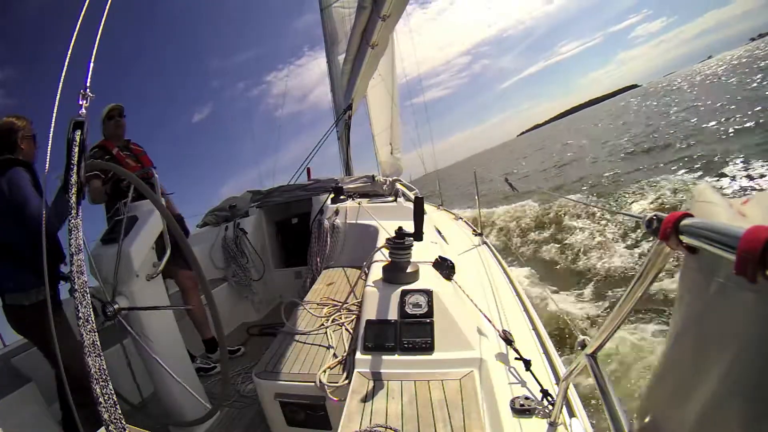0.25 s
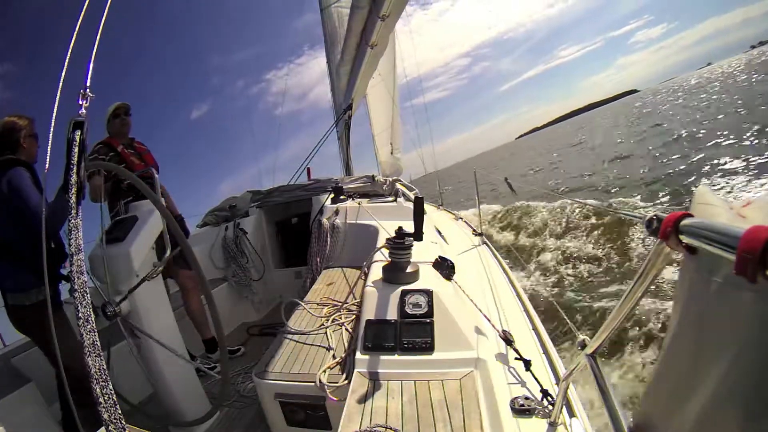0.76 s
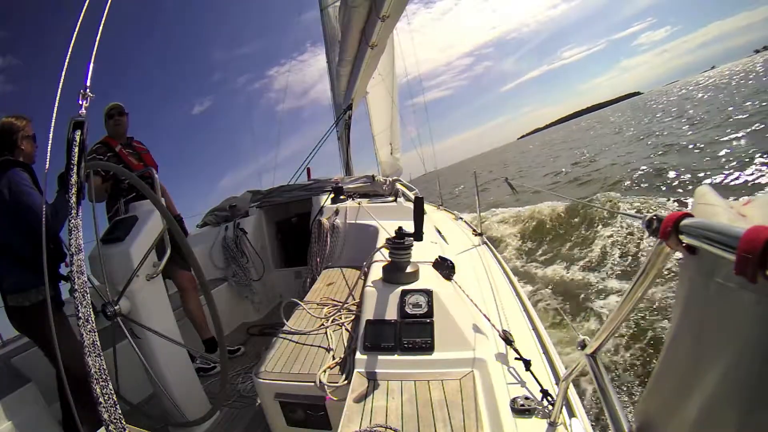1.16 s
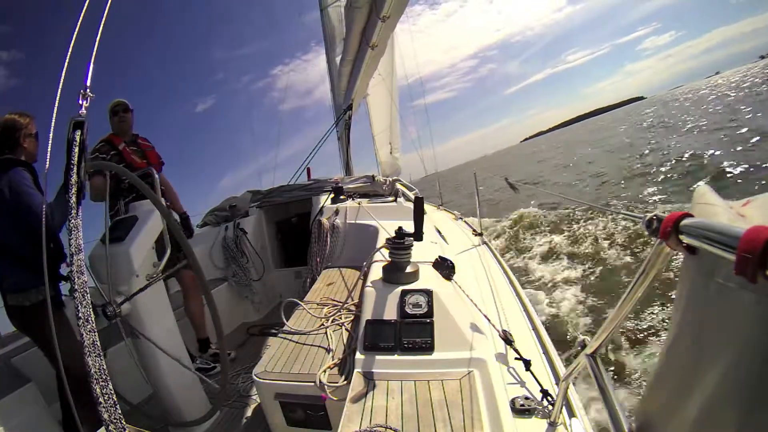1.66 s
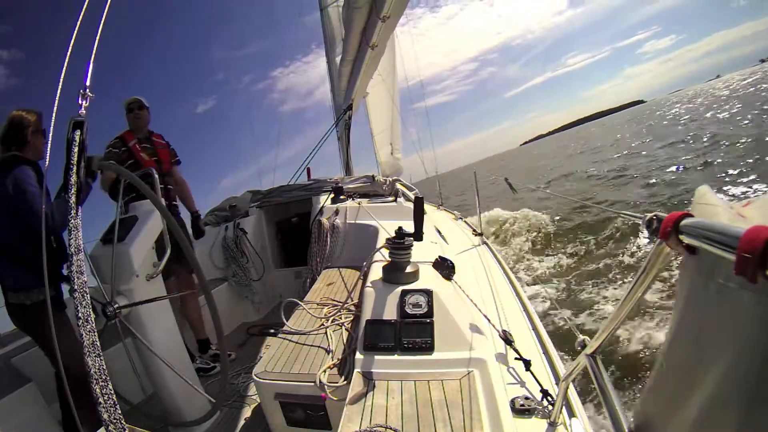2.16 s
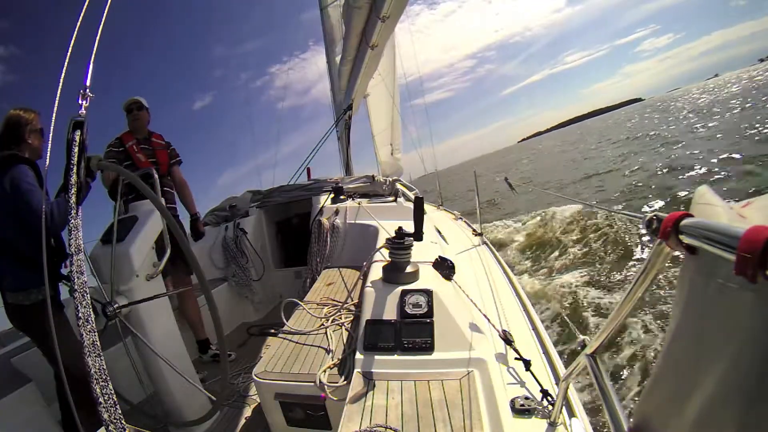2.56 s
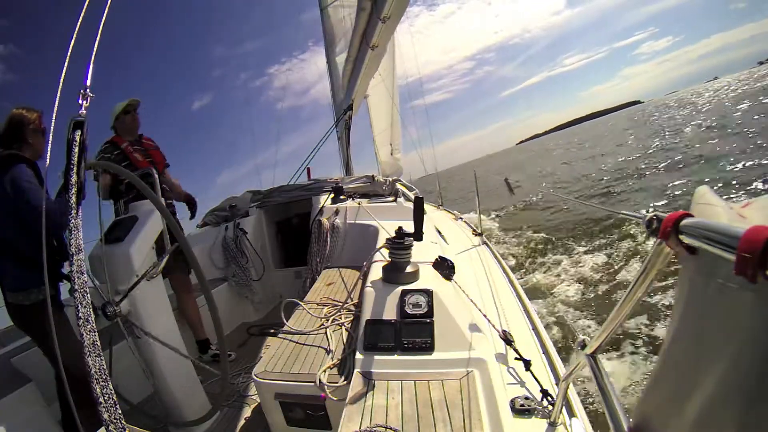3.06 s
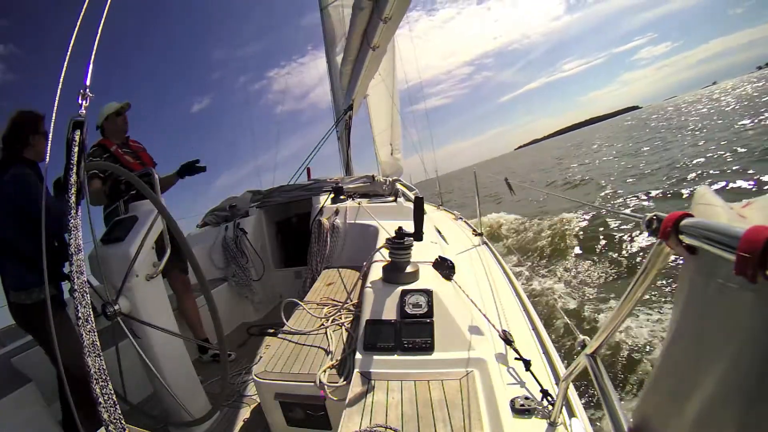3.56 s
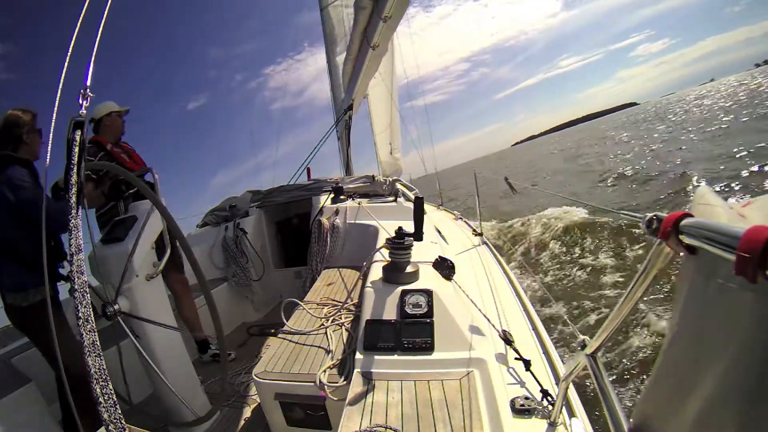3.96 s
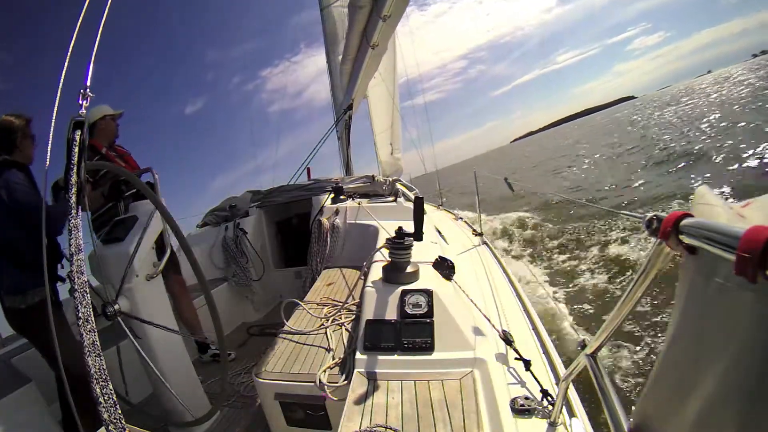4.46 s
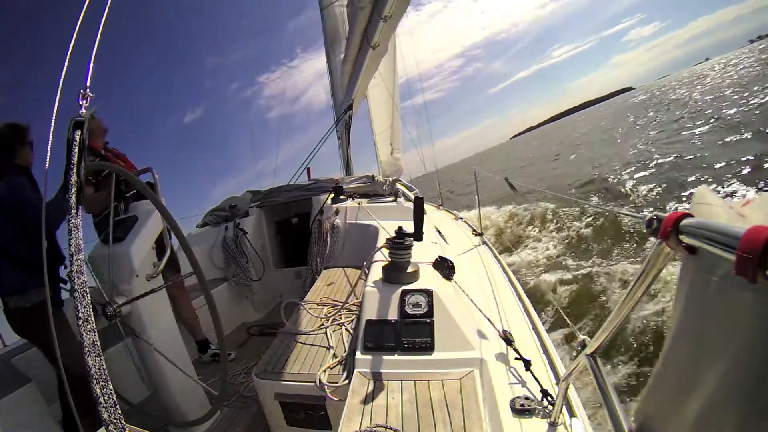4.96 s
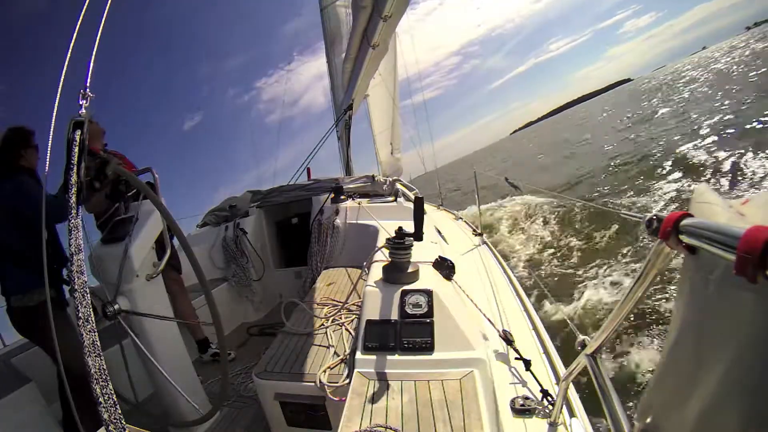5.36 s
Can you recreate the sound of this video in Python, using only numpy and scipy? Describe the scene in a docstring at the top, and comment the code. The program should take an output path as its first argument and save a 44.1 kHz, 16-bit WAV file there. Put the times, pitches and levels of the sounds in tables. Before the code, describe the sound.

One continuous mono passage of about 5.6 seconds, heard through a closed microphone case clamped on deck. A low hull hum and a deeper boom lead throughout, wavering in quick uneven swells; wind adds almost subsonic thumps, notably at 1.0 and 4.4. Water washes dully along the side, with softer bubbling foam and a thin fizz of spray. It begins fairly strong, eases after 0.7, swells around 3.0, thins near 4.2. Crackling wavelet slaps cluster at 0.05, 0.96, 1.65, 2.8-2.9 and 5.2. Faint dry ticks with tiny echoes come at 1.9, 2.2 (sharpest), 2.5, 2.7, 3.7, 4.5, 4.8 and 5.1. A rope creaks very briefly at 2.05; a low plop at 2.1 and quick falling blips at 3.6 and 3.8. From 4.4 the hull tone gathers and booms most heavily, peaking around 5.0-5.2 with a surge of wash, and foam rises again until the abrupt end.

```python
"""The hull of a sailing boat at speed hums and booms: noise shaped by its resonances, in swells.
Wind buffets a closed microphone case clamped on deck as slow, deep noise that peaks in gusts.
Slosh, foam and spray rush past as flickering noise, the last two mixed with bursting bubbles.
Wavelets slap the side as clumps of crackle, a fitting ticks as short echoing taps, short plops and
falling blips are dying sines, and a rope creaks once as a slip pulse train through resonances."""
import sys
import numpy as np
from scipy import signal
from scipy.fft import rfft, irfft
from scipy.io import wavfile
from scipy.ndimage import uniform_filter1d

SR = 44100
rng = np.random.default_rng(int(sys.argv[2]) if len(sys.argv) > 2 else 0)


def dump(signal):
    """Clip the signal to [-1, 1] and save it as 16-bit WAV at the path in sys.argv[1]."""
    limited = np.clip(np.atleast_2d(signal).T, -1, 1)
    pcm = np.round(limited * 32767).astype(np.int16)
    wavfile.write(sys.argv[1], SR, pcm)


def gain_from_db(level_db):
    """Turn a decibel level (scalar or array-like) into a linear amplitude factor."""
    decades = np.asarray(level_db, float) / 20
    return 10 ** decades


N = 247842  # length in samples

# how hard the sea works the boat: time_s, load_db
SEA_LOAD = [(0.0, 4), (0.7, -0.5), (1.2, 1.5), (1.7, 2), (2.3, -2), (3.0, -0.5), (3.6, 1), (4.2, 1.5),
            (4.7, -0.5), (5.1, 3.5), (5.62, 2.5)]

# Every spectrum below sets tone only: pitch_hz, level_db (relative, per Hz)
# hull hum, and its late form gathered on the upper resonance: pitch_hz, level_db
HUM_SPECTRUM = [(110, -50), (145, -26), (170, -13), (190, -5), (205, -6), (216, -3), (228, 1.5), (241, -9),
                (259, -14), (280, -14), (295, -21), (320, -28), (450, -60), (900, -130)]
HUM_LATE_SPECTRUM = [(110, -50), (151, -30), (183, -17), (196, -16), (215, -4), (233, 2), (244, -4),
                     (263, -14), (291, -19), (332, -28), (450, -60), (900, -130)]
# hull boom, and its late form gathered on the main resonance: pitch_hz, level_db
BOOM_SPECTRUM = [(20, -33), (34, -10), (46, -6), (56, 2), (66, -6), (76, -7), (92, -12.5), (112, -22.5),
                 (140, -23.5), (250, -76), (900, -130)]
BOOM_LATE_SPECTRUM = [(20, -29.5), (34, -12.5), (46, -6.5), (57, 3.5), (66, -3.5), (78, -11), (92, -15),
                      (112, -26), (140, -30), (250, -80), (900, -130)]
# crossfade from the early to the late hull tone: start_s, end_s
NARROWING_S = (4.2, 4.8)
# swells of the hum, then of the boom: centre_s, level_db
HUM_SWELLS = [(0.13, -47), (0.25, -39), (0.5, -43.5), (0.69, -45), (1.04, -46.5), (1.2, -52), (1.49, -47),
              (1.642, -42.5), (1.8, -47), (2.549, -42.5), (2.71, -46), (2.83, -46), (2.97, -47),
              (3.32, -43), (3.61, -47.5), (3.84, -42), (4.13, -47), (4.27, -48), (4.4, -42.5),
              (4.58, -40.5), (4.79, -43.5), (4.95, -41.5), (5.2, -39.5)]
BOOM_SWELLS = [(0.0, -44), (0.36, -45.5), (0.59, -43), (1.05, -56), (1.14, -44.5), (1.64, -47), (2.35, -49),
               (2.49, -45), (2.66, -44.5), (2.88, -44.5), (3.44, -44.5), (3.55, -43.5), (3.74, -51),
               (4.27, -45), (4.46, -43), (4.55, -41), (4.7, -39.5), (4.82, -42), (4.94, -39), (5.01, -37),
               (5.15, -37), (5.28, -40.5), (5.42, -39), (5.56, -44)]

# wind on the case: pitch_hz, level_db
BUFFET_SPECTRUM = [(1, -20), (3, 3), (12, 4.5), (22, -11.5), (35, -11), (60, -45.5), (200, -100)]
# gusts on the case: centre_s, level_db, half_length_s
GUSTS = [(0.08, -43, 0.038), (0.25, -43, 0.049), (1.04, -31.5, 0.027), (1.78, -44, 0.065),
         (2.01, -38, 0.032), (2.215, -37.5, 0.039), (2.495, -38, 0.018), (2.606, -48, .05),
         (2.7, -38.5, .03), (2.847, -43, 0.043), (3.105, -37.5, 0.06), (3.478, -39, 0.057),
         (3.692, -39.5, 0.02), (4.202, -47, 0.029), (4.303, -43, 0.022), (4.4, -31.5, 0.038),
         (4.62, -33.5, 0.037), (4.795, -39.5, 0.063), (4.954, -35.5, 0.036), (5.13, -39.5, 0.035),
         (5.276, -35.5, 0.032), (5.572, -37, 0.03)]

# water washing up the side and foam passing: time_s, wash_db, foam_db
WAKE_LEVELS = [(0.0, 1.5, 0.5), (0.3, 3.5, 2), (0.72, -1.5, -0.5), (1.22, -0.5, -1.5), (1.7, 0.5, 0),
               (2.17, -1.5, 2), (2.43, 1, 1), (2.97, 3, 0.5), (3.5, 0, 1), (3.85, -2.5, -1),
               (4.15, -3, -3.5), (4.45, -3, -2.5), (4.65, -1.5, -1.5), (4.84, 3, -0.5), (5.06, 5, 0.5),
               (5.32, 0, 0), (5.62, 3, 3.5)]
# dull water near the hull: pitch_hz, level_db
SLOSH_SPECTRUM = [(90, -66), (130, -4), (300, 2.5), (450, -2.5), (530, -2.5), (620, -6), (1100, -13),
                  (2500, -36.5), (5000, -63)]
# foam as heard through the case: pitch_hz, level_db
FOAM_SPECTRUM = [(500, -30), (1100, -11), (1450, 1.5), (1800, -4.5), (2150, -2.5), (2400, -9), (2750, -3.5),
                 (3300, -12.5), (4200, -32), (6200, -60)]
# fine spray: pitch_hz, level_db
SPRAY_SPECTRUM = [(2500, -23), (3600, 4), (4200, -4.5), (4700, -0.5), (5500, -7), (6500, -18.5),
                  (9000, -31)]

# wavelets slapping the hull: start_s, level_db, brightness_db (tilt of the treble), half_length_s
SLAPS = [(0.037, -51.5, -5, 0.0095), (0.059, -53, -1, 0.007), (0.079, -50, -2, 0.0073),
         (0.679, -59, -15, 0.005), (0.929, -54.5, -4, 0.0067), (0.954, -53, -8, 0.005),
         (0.967, -45.5, -4.5, 0.0066), (0.976, -46.5, -12, 0.0034), (1.241, -60, -12, 0.0033),
         (1.652, -46, -7, 0.0073), (1.667, -46.5, -4, 0.0043), (2.24, -56, -12, 0.0054),
         (2.535, -61, -4, 0.0069), (2.597, -59, -12, 0.0053), (2.798, -57, -4, 0.007),
         (2.815, -50.5, -6, 0.0074), (2.849, -48.5, -5, 0.0055), (2.869, -52, -3, 0.0058),
         (2.904, -53, -10, 0.0065), (3.379, -63, -7, 0.0063), (3.451, -63, -8, 0.0054),
         (4.836, -57.5, -10, 0.0098), (5.13, -65, -4, 0.006), (5.168, -47.5, -11, 0.0038),
         (5.177, -47.5, -4, 0.005), (5.191, -48.5, -2, 0.0061), (5.207, -51, -5.5, 0.0065),
         (5.24, -52.5, -0.5, 0.0055), (5.262, -54, -9, 0.0076)]
# dull part of a slap: pitch_hz, level_db
SLAP_SPECTRUM = [(200, -30), (350, -3), (800, 0), (1200, -3)]

# a fitting ticking: centre_s, peak_db (of the tap alone), brightness_db (level at 4800 Hz)
TICKS = [(1.8865, -47, -27), (2.2025, -31.5, -20), (2.537, -39, -18), (2.6998, -36, -14),
         (3.7248, -46, -29), (4.5212, -36, -35), (4.815, -35, -18.5), (5.1032, -45, -13)]
# body of the tap: pitch_hz, level_db
TICK_SPECTRUM = [(500, -22), (1100, -7), (1550, 0), (2000, 0), (2800, -3), (3600, -7)]
# echoes of the tap off the deck: delay_s, level_db (relative to the tap)
TICK_ECHOES = [(.00055, -5), (.001, -9), (.0015, -6), (.0019, -9), (.0027, -3), (.0035, -12), (.007, -14),
               (.0082, -15), (.015, -14)]

# plops and falling blips: start_s, level_db (before the decay), pitch_hz, t60_s, glide (share of pitch per s)
PLOPS = [(.92, -57, 3380, 0.065, .5), (2.135, -46, 427, 0.087, 1), (2.5, -55, 2260, 0.13, 0),
         (3.59, -53, 538, 0.14, 0), (3.59, -42.5, 2660, 0.03, -11), (3.61, -45, 2690, 0.03, -8),
         (3.791, -45.5, 1400, 0.055, -2.5)]

# the rope slipping: start_s, end_s, strong_slips_per_s, level_db, weak_db (drop of the slips between)
CREAK = (2.025, 2.09, 107.3, -52, 3)
# resonances that the rope rings: pitch_hz, width_hz, level_db
ROPE_RESONANCES = [(1500, 90, 0), (1930, 120, -7), (2150, 120, -9), (2590, 150, -13)]

# microphone hiss: pitch_hz, level_db
HISS_SPECTRUM = [(300, -1.5), (7000, 0.5), (11000, -2.5), (13000, -1), (15500, -2)]


def evened(x):
    """Scales a sound to an rms of one."""
    return x / np.sqrt(np.mean(x ** 2) + 1e-20)


def spectrum_db(points, hz):
    """Reads a spectrum table at any pitch, along a log pitch axis."""
    f, level_db = np.transpose(points)
    return np.interp(np.log(hz + 1), np.log(f + 1), level_db)


def curve(table, column):
    """Draws one column of a timed table as a line through the whole scene."""
    columns = np.transpose(table)
    return np.interp(np.arange(N) / SR, columns[0], columns[column])


def add(mix, start_s, sound):
    """Lays a sound into the mix from start_s on."""
    part = mix[max(round(start_s * SR), 0):][:len(sound)]
    part += sound[:len(part)]


def colour(x, points):
    """Filters by a spectrum."""
    gain = gain_from_db(spectrum_db(points, np.fft.rfftfreq(len(x), 1 / SR)))
    return irfft(rfft(x) * gain, len(x))


def steadied(x, size):
    """Takes out most of the slow chance swell, so that the written swells lead."""
    power = uniform_filter1d(uniform_filter1d(x ** 2, size=size), size=size)
    return evened(x / (power + 0.11 * np.mean(x ** 2)) ** 0.21)


def swelling(bed_db, swells):
    """A level that rises from its bed in bell-shaped swells; powers add."""
    t = np.arange(0, N + 64, 64) / SR
    power = sum(gain_from_db(db) ** 2 * np.exp(-((t - s) / half_s) ** 2) for s, db, half_s in swells)
    return np.sqrt(gain_from_db(bed_db) ** 2 + np.interp(np.arange(N) / SR, t, power))


def narrowing(early, late):
    """Noise whose spectrum crossfades from an early to a late, more gathered form."""
    noise = rng.standard_normal(N)
    share = np.interp(np.arange(N) / SR, NARROWING_S, (0, 1))
    return (1 - share) * evened(colour(noise, early)) + share * evened(colour(noise, late))


def hull_hum():
    """Turbulence shakes the hull at its upper resonances."""
    half_s = 0.032
    bed_db = -46.5 + curve(SEA_LOAD, column=1)
    level = swelling(bed_db, [row + (half_s,) for row in HUM_SWELLS])
    return level * steadied(narrowing(HUM_SPECTRUM, HUM_LATE_SPECTRUM), size=3000)


def hull_boom():
    """Turbulence shakes the hull at its low resonances."""
    half_s = 0.037
    bed_db = -51 + 0.94 * curve(SEA_LOAD, column=1)
    level = swelling(bed_db, [row + (half_s,) for row in BOOM_SWELLS])
    return level * steadied(narrowing(BOOM_SPECTRUM, BOOM_LATE_SPECTRUM), size=4000)


def wind_buffet():
    """Wind pushes on the case below the hull's resonances, harder in gusts."""
    level = swelling(-50.5 + 0.89 * curve(SEA_LOAD, column=1), GUSTS)
    return level * steadied(colour(rng.standard_normal(N), BUFFET_SPECTRUM), size=5000)


def patchy(points, patchy_db, flicker_db):
    """Random short-time spectra with drifting patches and a flicker shared by wide bands."""
    frames = N // 64 + 5
    a, b, patches, flicker = rng.standard_normal((frames, 129, 4)).T
    # axis 0 runs over pitch, axis 1 over time
    patches = evened(uniform_filter1d(uniform_filter1d(patches, size=3, axis=0), size=40, axis=1))
    flicker = evened(uniform_filter1d(uniform_filter1d(flicker, size=30, axis=0), size=14, axis=1))
    spectra = (a + 1j * b) * gain_from_db(patchy_db * patches + flicker_db * flicker)
    noise = signal.istft(spectra, nperseg=256, noverlap=192)[1][:N]
    return evened(colour(noise, points))


def dying_sine(hz, t60_s, glide):
    """A dying sine with a soft start; its pitch glides up, down or not at all."""
    t = np.arange(round(t60_s * SR)) / SR
    envelope = (1 - np.exp(-t * hz / 2)) * gain_from_db(-60 * t / t60_s)
    return envelope * np.sin(2 * np.pi * hz * (t + glide * t * t / 2))


def fizz(per_s, spread_db, cycles):
    """Many small bubbles of thirty sizes burst at random; a few are loud."""
    out = np.zeros(N)
    for hz in np.geomspace(400, 6000, num=30):
        chance, size = rng.random((N, 2)).T
        loud = gain_from_db(spread_db * np.minimum(-np.log(size + 1e-9), 4))
        bursts = (chance < per_s / 30 / SR) * loud
        out += signal.oaconvolve(bursts, evened(dying_sine(hz, cycles / hz, 0)))[:N]
    return out


def slosh():
    """Dull water washing up the side of the hull, as flickering noise."""
    return gain_from_db(-60.5 + curve(WAKE_LEVELS, column=1)) * patchy(SLOSH_SPECTRUM, patchy_db=2.0, flicker_db=1.5)


def foam():
    """Brighter foam passing, part hiss and part bursting bubbles."""
    hiss = patchy(FOAM_SPECTRUM, patchy_db=1.5, flicker_db=1.16)
    bubbles = evened(colour(fizz(per_s=1500, spread_db=1.5, cycles=8.2), FOAM_SPECTRUM))
    return gain_from_db(-57.5 + curve(WAKE_LEVELS, column=2)) * evened(hiss + gain_from_db(-6) * bubbles)


def spray():
    """Fine spray over the foam, hiss and ringing drops, rising 1.33 dB for a dB of foam."""
    hiss = patchy(SPRAY_SPECTRUM, patchy_db=1.5, flicker_db=1.5)
    drops = evened(colour(fizz(per_s=470, spread_db=4.0, cycles=21), SPRAY_SPECTRUM))
    return gain_from_db(-74 + 1.33 * curve(WAKE_LEVELS, column=2)) * evened(hiss + gain_from_db(-5.5) * drops)


def slaps():
    """Each wavelet is a short clump of crackle, dull or bright, inside a longer splash."""
    out = np.zeros(N)
    size, lead = 6000, 1500  # samples in all, and ahead of the start
    for start_s, level_db, bright_db, half_s in SLAPS:
        noise, grain = rng.standard_normal((size, 2)).T
        u = (np.arange(size) - lead) / SR / half_s
        # droplets land unevenly
        crackle = noise * gain_from_db(2.5 * evened(uniform_filter1d(grain, size=130)))
        treble = [(2000, bright_db - 4), (3200, 2 * bright_db - 11), (5000, 3 * bright_db - 35), (9000, -90)]
        clump = np.exp(-(u - .8) ** 2)
        splash = gain_from_db(-10) * np.exp(-((u - 1.1) / 2.8) ** 2)
        shape = clump + splash
        slap = evened(colour(crackle, SLAP_SPECTRUM + treble) * shape)
        # rms of the shape, so that short and long slaps share one scale
        shape_rms = np.linalg.norm(shape) / np.sqrt(size)
        add(out, start_s - lead / SR, gain_from_db(level_db) * shape_rms * slap)
    return out


def ticks():
    """A tap of one or two cycles, then its echoes off the deck."""
    out = np.zeros(N)
    for centre_s, peak_db, bright_db in TICKS:
        treble = [(4800, bright_db), (6500, bright_db - 16), (10000, bright_db - 40)]
        tap = colour(signal.unit_impulse(256, "mid"), TICK_SPECTRUM + treble)
        tap = tap / tap.max()
        for delay_s, echo_db in [(0, 0)] + TICK_ECHOES:
            add(out, centre_s + delay_s - 128 / SR, gain_from_db(peak_db + echo_db) * tap)
    return out


def plops():
    """Short plops and falling blips, each a dying sine."""
    out = np.zeros(N)
    for start_s, level_db, hz, t60_s, glide in PLOPS:
        add(out, start_s, gain_from_db(level_db) * dying_sine(hz, t60_s, glide))
    return out


def resonate(x, hz, width_hz):
    """Shifts the pitch hz down to zero, smooths twice, and shifts back: a steep resonance."""
    turn = np.exp(2j * np.pi * hz * np.arange(len(x)) / SR)
    r = np.exp(-np.pi * width_hz / SR)
    smooth = signal.lfilter([(1 - r) ** 2], [1, -2 * r, r * r], x / turn)
    return 2 * (turn * smooth).real


def creak():
    """A loaded rope slips in quick strong-weak pairs, ringing its block."""
    start_s, end_s, per_s, level_db, weak_db = CREAK
    turns = per_s * np.arange(round((end_s - start_s) * SR)) / SR
    strong = np.diff(np.floor(turns), prepend=0)
    weak = gain_from_db(-weak_db) * np.diff(np.floor(turns + .5), prepend=0)
    slips = strong + weak
    ring = evened(sum(gain_from_db(db) * evened(resonate(slips, hz, width_hz)) for hz, width_hz, db in ROPE_RESONANCES))
    out = np.zeros(N)
    add(out, start_s, gain_from_db(level_db) * ring * signal.windows.tukey(len(ring), .5))
    return out


def microphone_hiss():
    """The microphone's own steady noise."""
    return gain_from_db(-80) * evened(colour(rng.standard_normal(N), HISS_SPECTRUM))


def scene():
    """All sources at one microphone; the last few milliseconds fade out."""
    hull = hull_hum() + hull_boom()
    wake = slosh() + foam() + spray()
    details = slaps() + ticks() + plops() + creak()
    fade = np.minimum(np.arange(N)[::-1] / 300, 1)
    return ((hull + wind_buffet() + wake + details) * fade)[None]


def roll_off(x):
    """The treble ends steeply here."""
    return signal.sosfilt(signal.butter(12, 15610, fs=SR, output="sos"), x)


def record(dry):
    """Adds the microphone's hiss under the scene."""
    mix = dry + microphone_hiss()
    return roll_off(mix)


dry = scene()
out = record(dry)
dump(out)
```